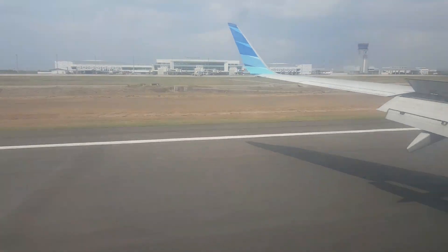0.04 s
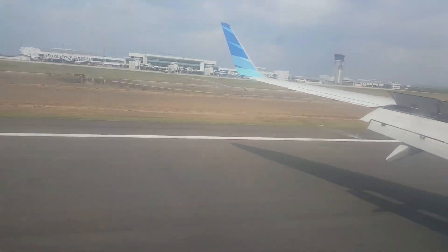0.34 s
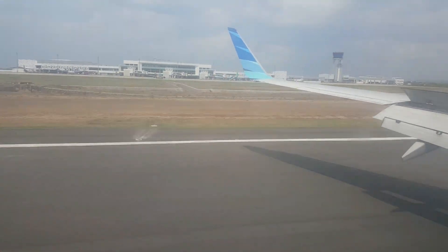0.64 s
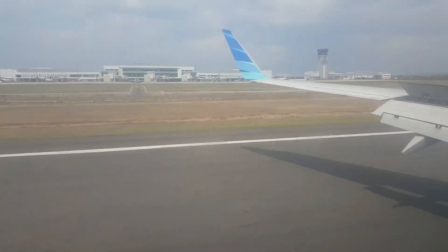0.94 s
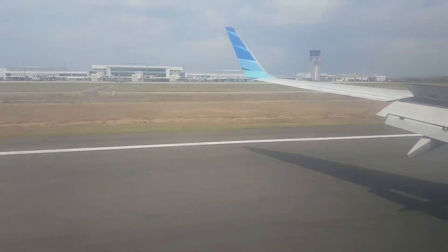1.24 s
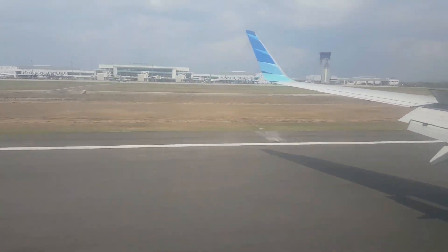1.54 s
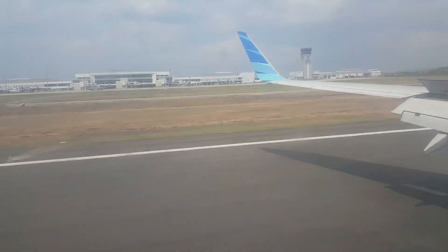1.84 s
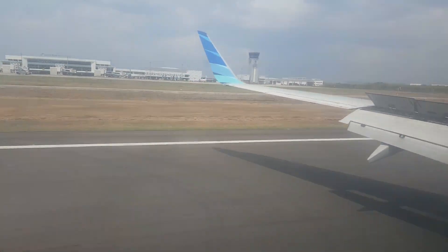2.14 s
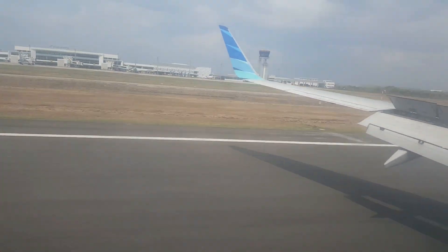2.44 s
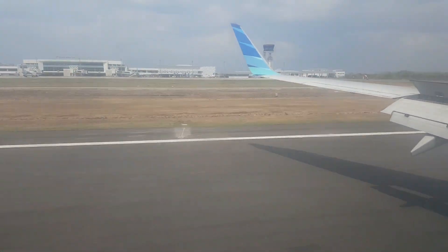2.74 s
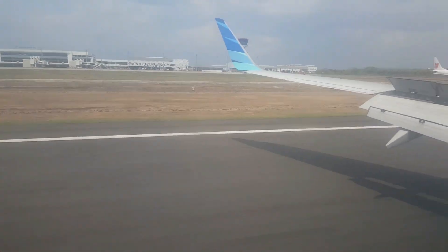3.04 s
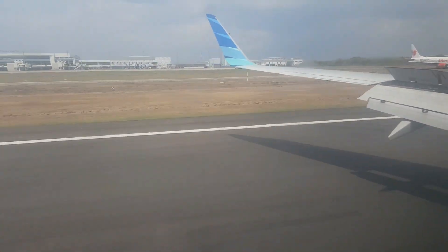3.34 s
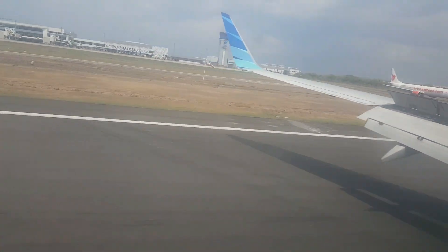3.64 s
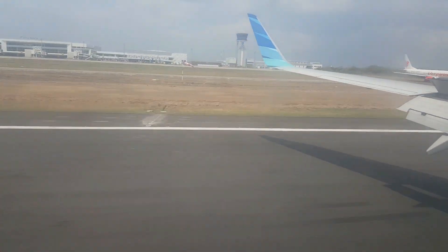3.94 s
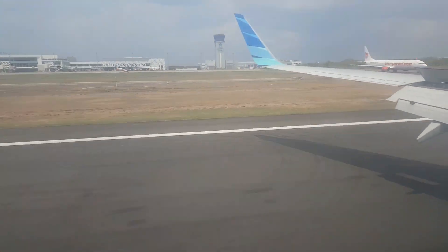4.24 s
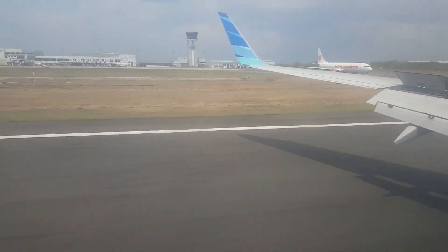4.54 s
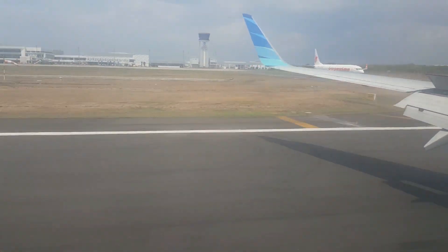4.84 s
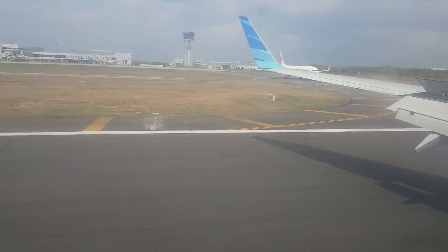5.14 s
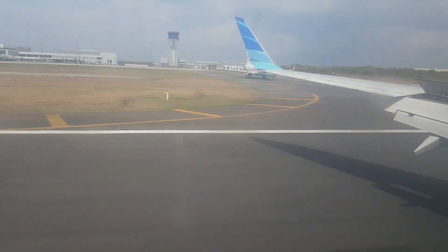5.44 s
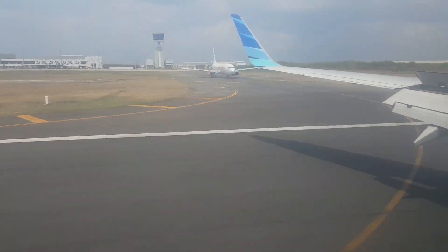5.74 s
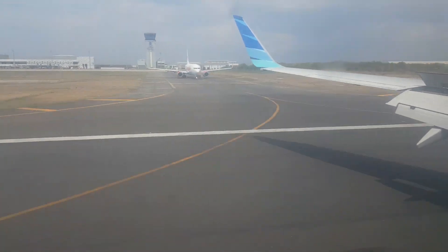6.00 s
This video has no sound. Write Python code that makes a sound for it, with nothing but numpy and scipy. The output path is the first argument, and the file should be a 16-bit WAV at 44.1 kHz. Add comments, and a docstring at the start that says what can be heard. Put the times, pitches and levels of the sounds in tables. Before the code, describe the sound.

A dense low rumble of wheels and jet engines fills an airliner cabin throughout, picked up from a seat beside the wing as the plane rolls down the runway. A softer airy rush swells briefly over bumps and gradually eases. Loose plastic panels give quiet, irregular ticks and creaks, and a thin turbine whine comes up faintly in the middle before sinking back.

```python
"""Airliner cabin on the runway

A window seat by the wing. Wheels and idling engines rumble through the fuselage and its resonances,
over a faint turbine whine and a rush of air that eases a little as the aircraft slows.
The shaking makes the plastic trim rub, tick and squeak softly."""
import sys
import numpy as np
from scipy import signal
from scipy.fft import rfft, irfft, next_fast_len
from scipy.io import wavfile
from scipy.ndimage import uniform_filter1d

SR = 44100
rng = np.random.default_rng(int(sys.argv[2]) if len(sys.argv) > 2 else 0)


def store_wav(level_fs):
    """Save 16-bit WAV to argv[1]."""
    pcm = np.round(np.clip(np.atleast_2d(level_fs), -1, 1) * 32767)
    wavfile.write(sys.argv[1], SR, pcm.T.astype(np.int16))


N = 276507
TIME = np.arange(N) / SR
BINS = np.maximum(np.arange(N // 2 + 1) * SR / N, 1)
CUTOFF_HZ = 15700

# resonances of the cabin air and wall panels: f/Hz, width/Hz, lift/dB
CABIN_MODES = [(53, 33, 6.5), (91.8, 2.1, 4), (104.6, 19, 7.5), (186, 31, 2), (223, 12, 3), (328, 90, 3),
               (401.4, 24, 6), (536, 4.4, 2.5), (860, 50, 3.3), (1274, 91, 5.5)]
# stereo width at the seat: f/Hz, left-right correlation
STEREO_CORRELATION = [(41, 0.99), (101, 1), (161, 0.97), (231, 1), (321, 0.93), (441, 0.97), (521, 0.19),
                      (621, 0.66), (741, 0.75), (901, 0.36), (1051, 0.32), (1281, -0.51), (1551, -0.33),
                      (2301, 0.071)]
# stereo lean: f/Hz, left over right/dB
STEREO_BALANCE = [(61, 0), (121, 1.06), (201, 1), (401, 3.5), (521, 4), (681, -2), (951, 1.5), (1401, 0.5),
                  (2051, 0), (2801, 2.5), (4001, -0.6), (6501, -4), (9301, 8.5), (11501, 2)]

# the compressor whine comes up halfway and recedes: t/s, level/dB
COMPRESSOR_RIDE = [(2.9, -72), (3.3, -63.5), (3.8, -58.5), (4.4, -61), (5.0, -69.5), (6.27, -67.5)]
# tone of the exhaust roar and the cabin air: f/Hz, relative level/dB
ROAR_EQ = [(310, -13), (485, 2), (605, -0.5), (805, -1.5), (935, -7.5), (1110, -11), (1410, -17),
           (1910, -29)]
HISS_EQ = [(710, -15), (1510, 5), (2310, -1.5), (2810, -5.5), (3810, -7.5), (5010, -14.5), (7010, -19.5),
           (9310, -28), (10610, -33.5), (13010, -33.5), (15700, -38)]
# rough patches of runway swell the rush: peak t/s, lift/dB, half-length/s
RUNWAY_BUMPS = [(0.496, 1, 0.054), (.885, 4, 0.071), (1.445, 2.5, .045), (1.927, 3, 0.12),
                (2.408, 3, 0.035), (3.0, 2, 0.079), (3.418, 3.5, .012), (5.84, 2, 0.042)]

# tone of sliding and of knocking trim: f/Hz, relative level/dB
RUB_EQ = [(910, -2), (2010, 6.5), (3510, -2), (5010, -5.5), (7010, -6.5), (9310, -14), (10610, -22.5),
          (13010, -19.5), (15700, -25.5)]
TICK_EQ = [(710, -13.5), (1510, 4.5), (2910, -1), (4210, -8.5), (5510, -13.5), (7510, -21.5),
           (11010, -30.5)]
# clear rubs as the cabin sways: peak t/s, level/dB, half-length/s
RUB_CUES = [(.35, -58, .022), (0.435, -55.5, 0.02), (0.476, -51.5, 0.011), (0.63, -56, 0.011),
            (0.692, -54, 0.011), (0.873, -59, 0.02), (.942, -56.5, 0.019), (1.026, -53.5, 0.017),
            (1.181, -51, 0.009), (1.29, -51.5, .012), (1.309, -52, .011), (1.69, -59, 0.018),
            (1.763, -56.5, .025), (1.88, -54, 0.031), (1.961, -54, 0.011), (2.002, -54.5, 0.013),
            (2.072, -56, 0.013), (2.16, -59.5, .014), (2.26, -60, .012), (2.394, -51.5, 0.014),
            (2.419, -53, 0.011), (2.495, -54, 0.0086), (2.57, -54, 0.011), (2.617, -60, 0.011),
            (2.816, -55.5, 0.031), (2.878, -58, .014), (3.1, -53, 0.021), (3.166, -54.5, .025),
            (3.255, -55, .016), (3.504, -55, 0.012), (3.677, -55, 0.014), (3.75, -58, 0.017),
            (3.972, -58, .012), (4.085, -62.5, .014), (4.153, -59, 0.015), (4.43, -61, .012),
            (4.676, -58, 0.04), (4.87, -54, 0.016), (5.34, -54, 0.014), (5.545, -61.5, 0.015),
            (5.785, -57, 0.011), (5.836, -60, 0.038)]
# restless bed under those rubs: t/s, level/dB
RUB_BED_RIDE = [(0, -63), (1.9, -63), (3.0, -64.5), (4.3, -64.5), (6.27, -63)]
# ring of a trim panel: f/Hz, width/Hz, lift/dB
PANEL_MODES = [(1480, 180, 3), (2460, 200, 3), (2920, 450, 5), (3240, 120, 3), (4300, 300, 3)]
# trim knocks on its clips: t/s, relative level/dB, t60/s, mode f/Hz, mode over dull knock/dB
TICK_CUES = [(0.824, -46, 0.034, 2850, 8), (1.066, -48.5, 0.031, 2700, 4), (1.357, -45, .025, 2880, -1),
             (1.376, -60, .012, 9500, 1), (1.851, -50, .055, 2700, 2), (2.756, -46.5, 0.09, 3180, -6),
             (2.921, -49, 0.23, 3400, -7), (3.177, -41.5, 0.071, 2090, -4), (3.184, -50, .04, 4100, 0),
             (3.782, -51, 0.038, 2700, 4), (3.838, -53, .05, 4240, -2), (4.674, -45, 0.038, 1930, 4),
             (5.83, -49.5, 0.072, 2600, -4)]
# dry plastic squeaks: peak t/s, half-length/s, f/Hz, width/Hz, level/dB
SQUEAK_CUES = [(.937, 0.0037, 6300, 1400, -58), (2.843, 0.012, 1470, 45.2, -49)]

# tone of the four rumble layers, lowest first: f/Hz, relative level/dB
AIRFRAME_EQ = [(16, -29), (26, -17), (39, -11.5), (51, -4), (64, -4.5), (76, -15.5)]
WHEEL_EQ = [(58, -21), (72, -7.5), (86, -1), (113, -5.5), (123, -4), (145, -11), (190, -32)]
WALL_EQ = [(92, -28), (131, -5), (161, -3.5), (186, -0.44), (226, -3), (266, -5.5), (300, -14), (350, -30)]
ENGINE_EQ = [(230, -21), (275, -5), (310, 0.5), (371, -3.5), (441, -7.5), (492, -14.5)]
# fader rides for airframe shudder, wheel boom, wall drone and engine growl: t/s, relative level/dB
AIRFRAME_RIDE = [(0.0, -32.5), (0.12, -28.5), (0.48, -24), (0.6, -30), (0.8, -20.5), (0.92, -31.5),
                 (1.04, -26), (1.28, -34.5), (1.68, -26.5), (1.92, -27.5), (2.52, -31.5), (2.64, -33),
                 (2.96, -25), (3.2, -28), (3.32, -33.5), (3.68, -34), (3.8, -27.5), (4.0, -31.5),
                 (5.0, -27), (5.28, -34.5), (5.48, -23.5), (5.6, -36), (6.0, -22), (6.26, -32)]
WHEEL_RIDE = [(0.0, -17.5), (0.2, -24.5), (0.28, -19.5), (0.36, -26.5), (1.04, -21), (1.12, -24.5),
              (1.32, -18.5), (1.44, -25.5), (1.52, -21.0), (1.76, -24.5), (1.84, -21.5), (2.6, -23),
              (2.76, -27), (2.84, -24), (2.92, -24.5), (3.04, -19.5), (3.28, -19), (3.36, -27.5),
              (3.4, -21.0), (3.88, -21.0), (3.92, -22), (4.04, -25), (4.12, -19.5), (4.28, -22), (4.4, -21),
              (4.48, -25), (4.76, -22), (4.84, -27), (4.92, -21), (5.16, -25.5), (5.24, -19), (5.36, -25),
              (5.52, -21), (5.6, -23.5), (5.68, -17.5), (5.84, -26), (5.96, -18.5), (6.26, -31.5)]
WALL_RIDE = [(0.0, -19.5), (0.44, -20.0), (0.48, -22), (0.64, -19.5), (0.8, -22.0), (0.96, -19),
             (1.2, -22.0), (1.76, -19), (1.88, -23), (2.08, -20), (2.16, -23.0), (2.36, -20.5), (2.44, -22),
             (2.64, -18.5), (2.84, -22.5), (2.88, -21), (3.08, -23.5), (3.36, -20.5), (3.52, -21),
             (3.84, -23.0), (3.96, -18.5), (4.12, -22.5), (4.2, -20.5), (4.32, -22), (4.44, -19.5),
             (4.6, -24.0), (4.84, -19), (5.0, -23.5), (5.12, -20.5), (5.24, -21.5), (5.4, -17.5),
             (5.48, -21), (6.0, -22), (6.26, -20.5)]
ENGINE_RIDE = [(0, -33), (.56, -30.5), (1.2, -32.5), (1.5, -31), (1.9, -31), (2.1, -33), (2.4, -31.5),
               (3.5, -32), (4.2, -32), (4.52, -30), (4.97, -33), (5.21, -30), (5.4, -33), (6.27, -33)]


def from_db(db):
    """Decibels to gain."""
    return 10 ** (np.asarray(db) / 20)


def unit_rms(x):
    """Scale to unit mean power."""
    return x / np.sqrt(np.mean(x ** 2) + 1e-20)


def over_time(ride):
    """A fader ride, sample by sample."""
    return np.interp(TIME, *np.transpose(ride))


def over_hz(points):
    """A curve joined by straight lines on a log frequency axis."""
    hz, value = np.transpose(points)
    return np.interp(np.log(BINS), np.log(hz), value)


def colour(eq):
    """Gain of an EQ curve, falling 24 dB an octave beyond its ends."""
    inside = np.clip(BINS, eq[0][0], eq[-1][0])
    return from_db(over_hz(eq) - 24 * np.abs(np.log2(BINS / inside)))


def bell(hz, width_hz):
    """Power response of one resonance, 1 on top."""
    return 1 / (1 + (2 * (BINS - hz) / width_hz) ** 2)


def resonances(modes):
    """Gain of a bank of bell boosts."""
    return from_db(sum(db * bell(hz, width) for hz, width, db in modes))


def panned(db):
    """Left and right gains; positive leans left."""
    return from_db(np.array([[.5], [-.5]]) * db)


def noise():
    """Two unrelated white noises."""
    return rng.standard_normal((2, N))


def drift(rate_hz):
    """Smooth random modulation with a spread of 1."""
    steps = N // 40
    hz = BINS[:steps // 2 + 1]
    slow = irfft(rfft(rng.standard_normal(steps)) / (1 + (hz / rate_hz) ** 2), steps)
    return np.interp(TIME, np.linspace(0, N / SR, steps), unit_rms(slow))


def steadied(x, window_s, share):
    """Level out a share of the swells, keeping the mean power."""
    power = uniform_filter1d(np.mean(x ** 2, axis=0), int(window_s * SR))
    power = uniform_filter1d(power, int(window_s * SR / 2))
    return np.std(x) * unit_rms(x * (power + 1e-12) ** (-share / 2))


def in_cabin(force, tone, correlation=0):
    """Spread two forces in stereo and colour them with a source's tone and the cabin's resonances."""
    mid, side = rfft(force)
    correlation = np.clip(correlation, -.9999, .9999)
    pair = np.sqrt(1 + correlation) * mid + np.sqrt(1 - correlation) * side * [[1], [-1]]
    return unit_rms(irfft(pair * tone * resonances(CABIN_MODES) * panned(over_hz(STEREO_BALANCE)), N))


def turbulence(tone):
    """A steady random force heard through the cabin."""
    return in_cabin(noise(), tone, over_hz(STEREO_CORRELATION))


def wavering(x, wander, waver_db, rate_hz):
    """Let a tone wander in pitch (by a share of it) and in level."""
    clock = TIME + np.cumsum(wander * drift(rate_hz)) / SR
    bent = np.array([np.interp(clock % TIME[-1], TIME, side) for side in x])
    return from_db(waver_db * drift(rate_hz)) * bent


def blade_whine(turbine_db, correlation):
    """Turbine and compressor blade tones, smeared into wavering bands by turbulent flow."""
    turbine = in_cabin(noise(), bell(hz=2102, width_hz=270), correlation)
    compressor = in_cabin(noise(), bell(hz=1112, width_hz=12), correlation)
    compressor = steadied(compressor, window_s=.065, share=.74)
    turbine = wavering(turbine, wander=.014, waver_db=1.3, rate_hz=9)
    compressor = wavering(compressor, wander=.008, waver_db=1.7, rate_hz=7)
    return from_db(turbine_db) * turbine + from_db(over_time(COMPRESSOR_RIDE)) * compressor


def airflow(roar_db, hiss_db, surge_db, flutter_db):
    """Exhaust roar dulled by the wall, and hissing cabin air; both swell with the runway's bumps."""
    bumps_db = sum(db * np.exp(-((TIME - s) / half) ** 2) for s, db, half in RUNWAY_BUMPS)
    swell_db = bumps_db + surge_db * drift(16)
    roar_ease_db, hiss_ease_db = .3 * TIME, .12 * TIME  # the aircraft slows
    roar = from_db(roar_db - roar_ease_db + swell_db) * turbulence(colour(ROAR_EQ))
    hiss_gain = from_db(hiss_db - hiss_ease_db + .65 * swell_db + flutter_db * drift(22))
    return roar + hiss_gain * turbulence(colour(HISS_EQ))


def wandering_contact(x, depth_db, rate_hz):
    """The contact point wanders, so each group of panel modes swells and fades on its own."""
    size = next_fast_len(N, True)
    spectrum = rfft(x, size)
    band = np.round(16 * np.sqrt(np.linspace(0, SR / 2, size // 2 + 1) / CUTOFF_HZ))
    groups = (irfft(spectrum * (band == k), size)[:, :N] for k in range(4, 17))
    return unit_rms(sum(from_db(depth_db * drift(rate_hz)) * modes for modes in groups))


def trim_rubs(grain_db, judder_db, pan_db):
    """Plastic trim slides in dense tiny slips that swell and fade with each sway."""
    slips = noise() * from_db(grain_db * drift(300))
    moments = TIME[::40]
    rub_power = sum(from_db(2 * db) * np.exp(-((moments - s) / half) ** 2) for s, db, half in RUB_CUES)
    judder = 2 * np.tanh(drift(19) / 2)  # the panels never lie quite still
    bed = from_db(over_time(RUB_BED_RIDE) + judder_db * judder)
    envelope = np.sqrt(np.interp(TIME, moments, rub_power) + bed ** 2)
    friction = wandering_contact(in_cabin(slips, colour(RUB_EQ)), depth_db=1.9, rate_hz=40)
    return envelope * friction * panned(pan_db)


def trim_ticks(gain_db, attack_s, mode_q, chatter_per_s, chatter_db, chatter_t60_s, pan_db):
    """Loose panels tap their clips: a faint chatter, and clear knocks that each ring one damped mode."""
    taps = (rng.random(N) < chatter_per_s / SR) * from_db(chatter_db) * rng.random(N)
    decay = from_db(-60 / (chatter_t60_s * SR))
    chatter = signal.lfilter([1], [1, -decay], taps + 1e-18)
    body = in_cabin(noise(), colour(TICK_EQ) * resonances(PANEL_MODES))
    contact = noise()
    out = chatter * body
    for s, db, t60, hz, mode_db in TICK_CUES:
        sounding = (TIME >= s) & (TIME < s + t60)
        age = TIME[sounding] - s
        peak = signal.iirpeak(hz, mode_q, fs=SR)
        mode = unit_rms(signal.lfilter(*peak, signal.lfilter(*peak, contact[:, sounding])))
        envelope = from_db(db - 60 * age / t60) * (1 - np.exp(-age / attack_s))
        out[:, sounding] += envelope * (body[:, sounding] + from_db(mode_db) * mode)
    return from_db(gain_db) * out * panned(pan_db)


def trim_squeaks(pan_db):
    """For a moment the slips fall into step and the plastic squeaks."""
    out = np.zeros((2, N))
    for s, half, hz, width, db in SQUEAK_CUES:
        tone = steadied(turbulence(bell(hz, width)), window_s=.02, share=1)
        out += from_db(db) * np.exp(-((TIME - s) / half) ** 2 / 2) * tone
    return out * panned(pan_db)


def throb(eq, ride, gain_db, window_s, share):
    """One band of low vibration, levelled so that its fader ride shapes the throb."""
    return from_db(over_time(ride) + gain_db) * steadied(turbulence(colour(eq)), window_s, share)


def rumble():
    """Wheels shake the airframe and low cabin modes; engines drive the walls and growl above them."""
    shudder = throb(AIRFRAME_EQ, AIRFRAME_RIDE, gain_db=-.5, window_s=.15, share=.75)
    boom = throb(WHEEL_EQ, WHEEL_RIDE, gain_db=.05, window_s=.065, share=.9)
    drone = throb(WALL_EQ, WALL_RIDE, gain_db=.18, window_s=.09, share=.58)
    growl = throb(ENGINE_EQ, ENGINE_RIDE, gain_db=1, window_s=.17, share=.78)
    return steadied(shudder + boom + drone + growl, window_s=.01, share=.23)  # glue into one dense bed


def scene():
    """The mix at the window seat."""
    shaking = rumble()
    air = airflow(roar_db=-39.5, hiss_db=-54, surge_db=1.04, flutter_db=1.1)
    whine = blade_whine(turbine_db=-61, correlation=.4)
    rubs = trim_rubs(grain_db=2.5, judder_db=2.5, pan_db=-1.5)
    ticks = trim_ticks(gain_db=-1.5, attack_s=.0002, mode_q=3.7,
                       chatter_per_s=16, chatter_db=-51.5, chatter_t60_s=.035, pan_db=-1)
    return whine + air + rubs + ticks + trim_squeaks(pan_db=-3) + shaking


def record(dry):
    """A steep high cut, and a 3 ms fade at each end."""
    high_cut = signal.ellip(10, .1, 80, CUTOFF_HZ, fs=SR, output="sos")
    from_edge_s = np.minimum(TIME, TIME[-1] - TIME)
    fade = np.sin(np.pi / 2 * np.clip(from_edge_s / .003, 0, 1)) ** 2
    return fade * signal.sosfilt(high_cut, dry)


dry = scene()
out = record(dry)
store_wav(out)
```